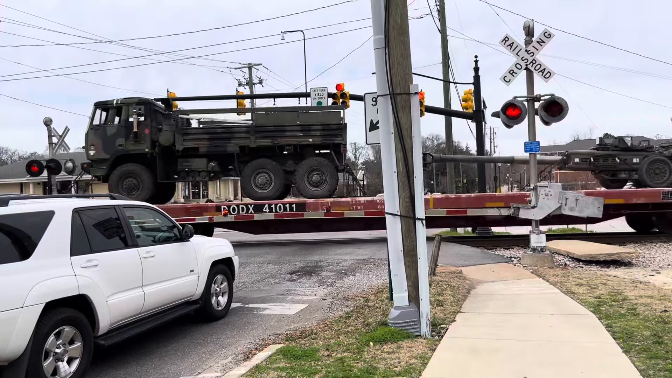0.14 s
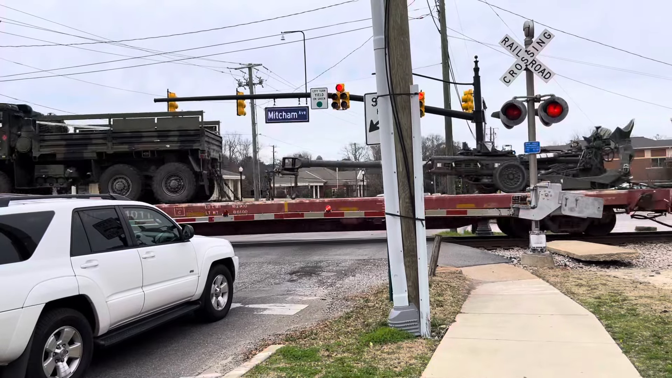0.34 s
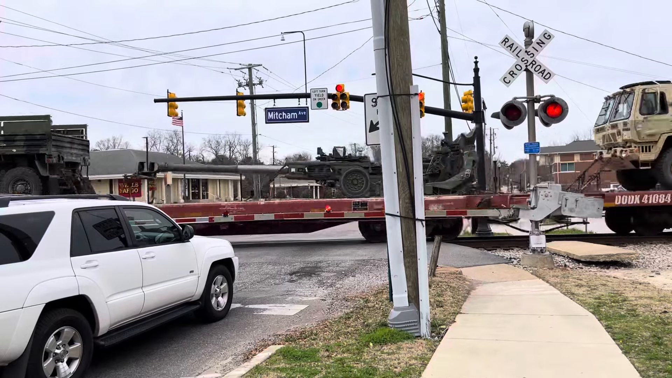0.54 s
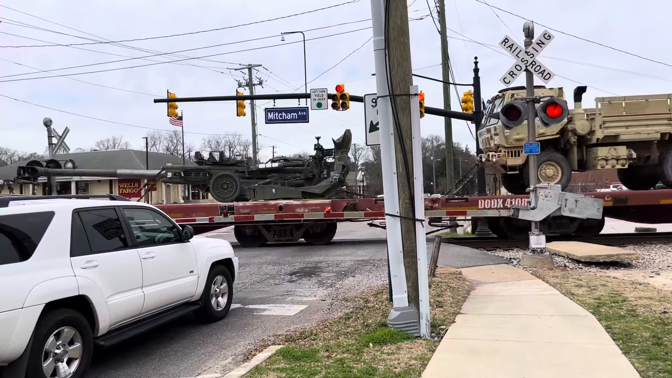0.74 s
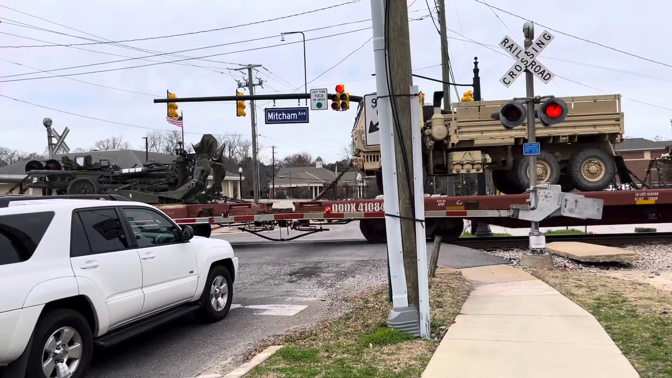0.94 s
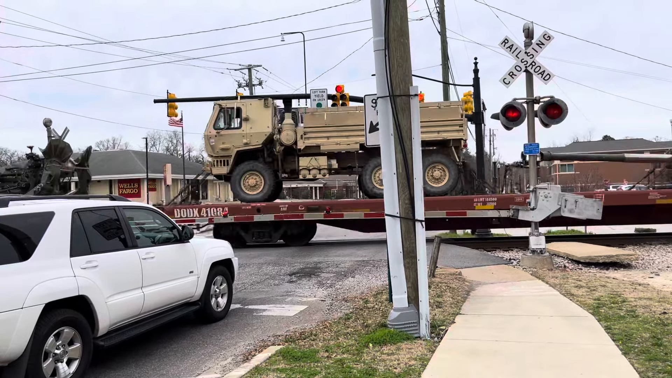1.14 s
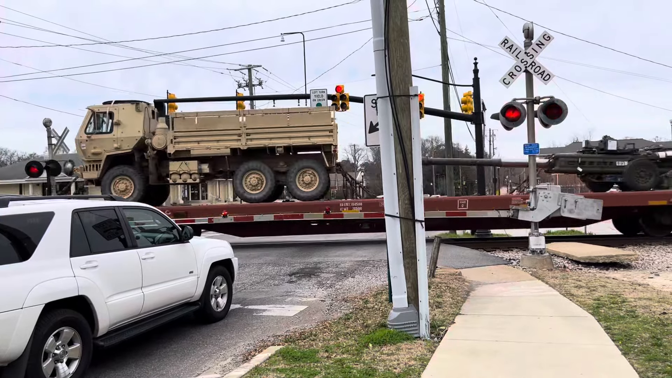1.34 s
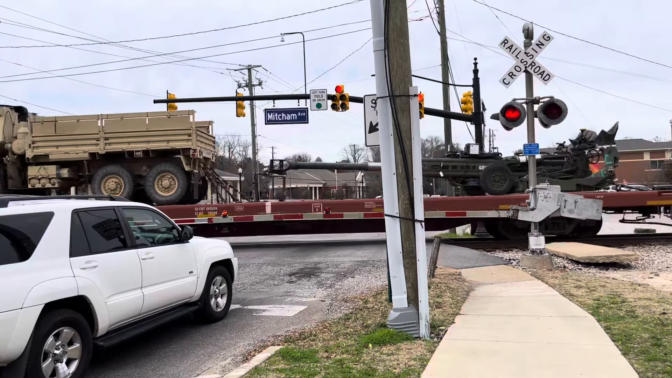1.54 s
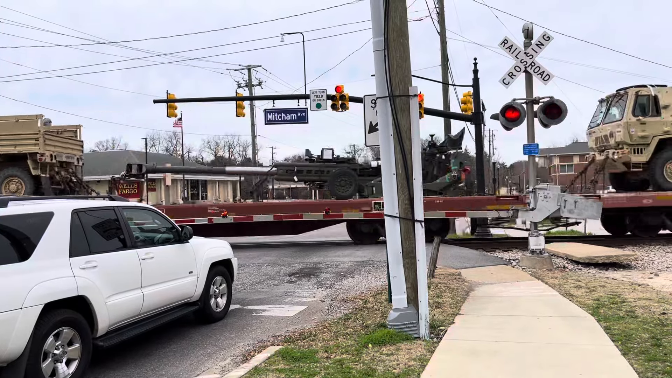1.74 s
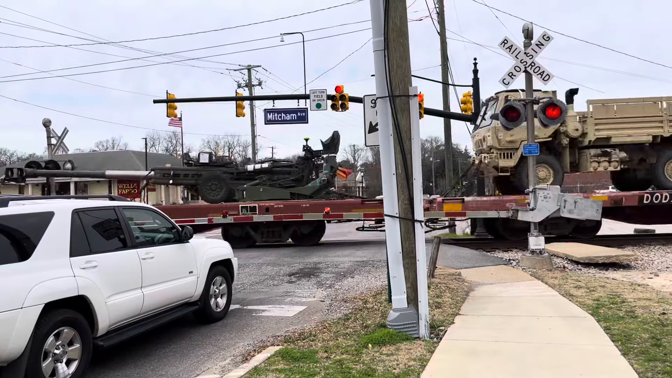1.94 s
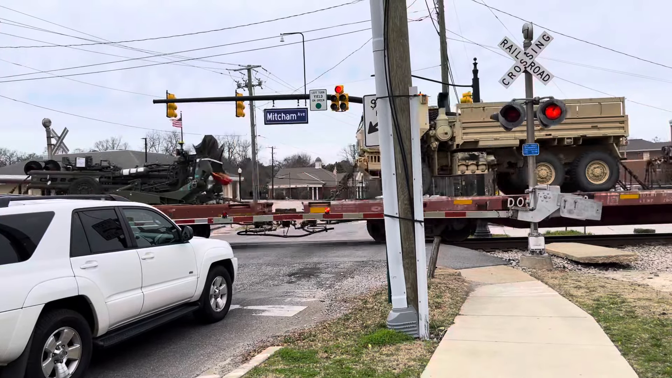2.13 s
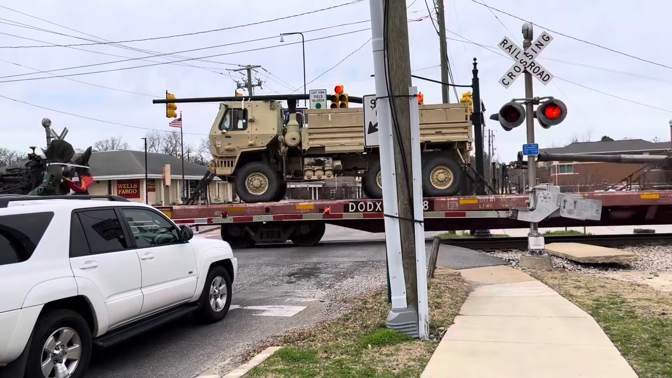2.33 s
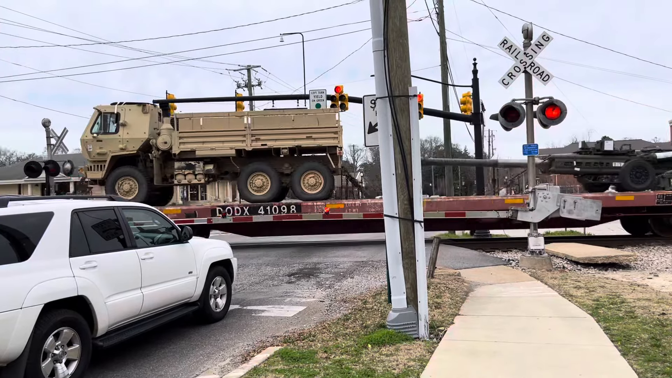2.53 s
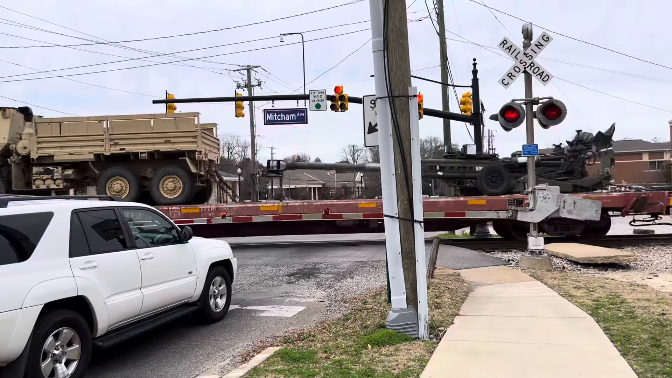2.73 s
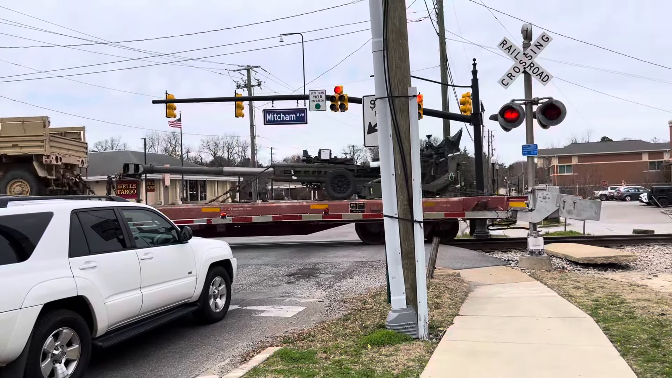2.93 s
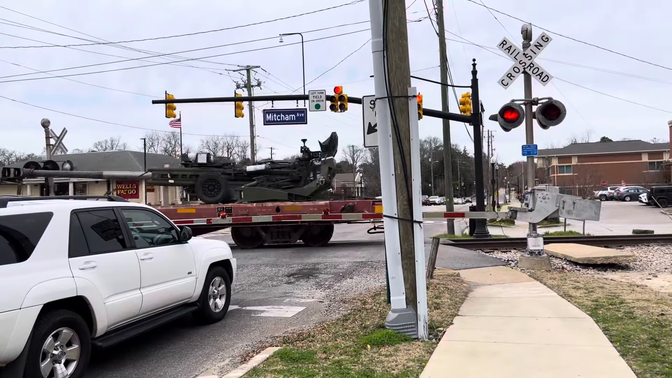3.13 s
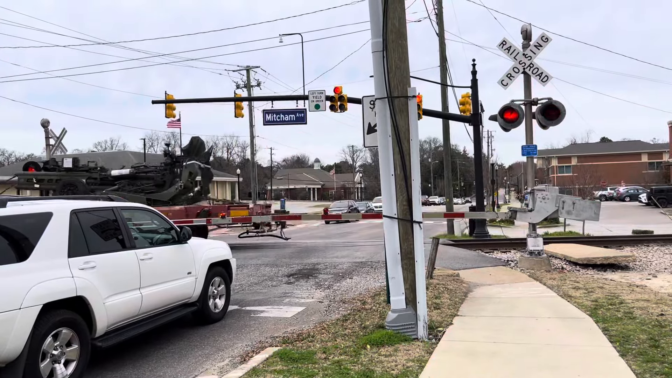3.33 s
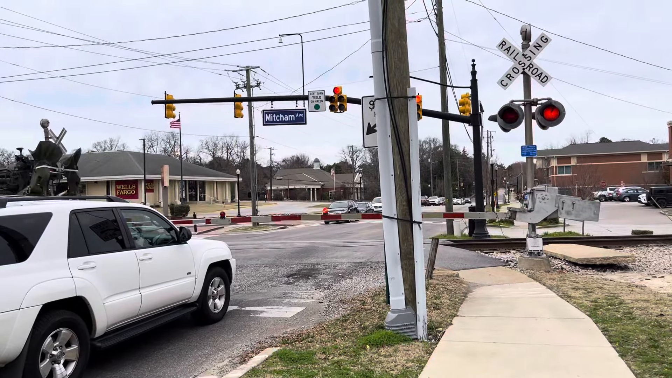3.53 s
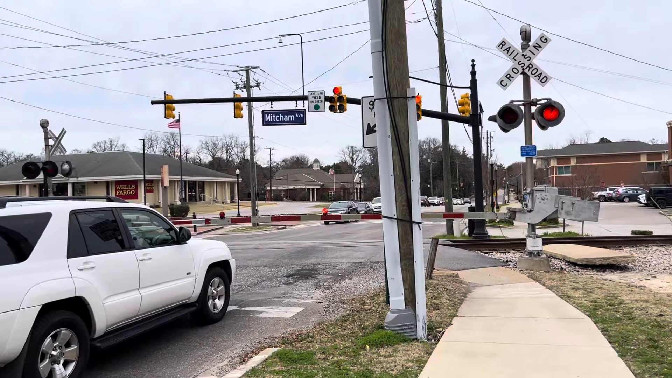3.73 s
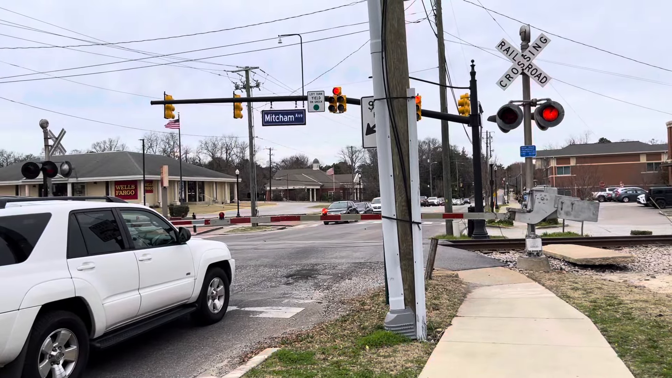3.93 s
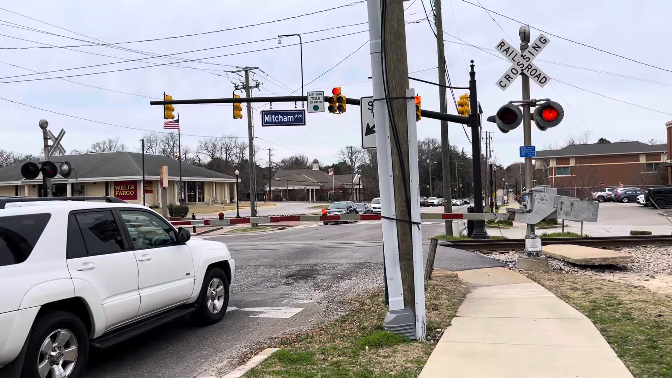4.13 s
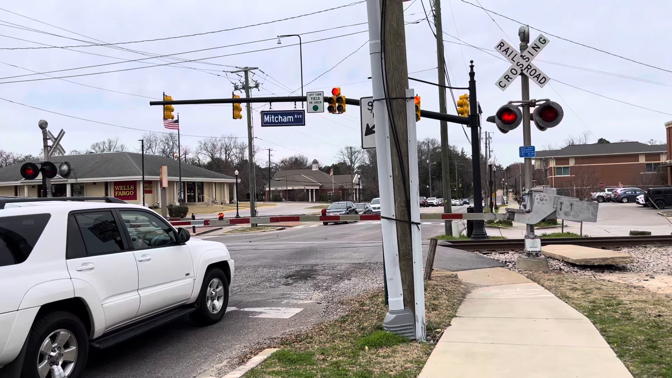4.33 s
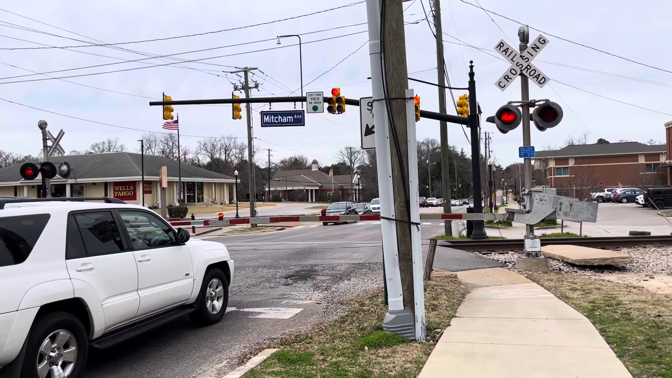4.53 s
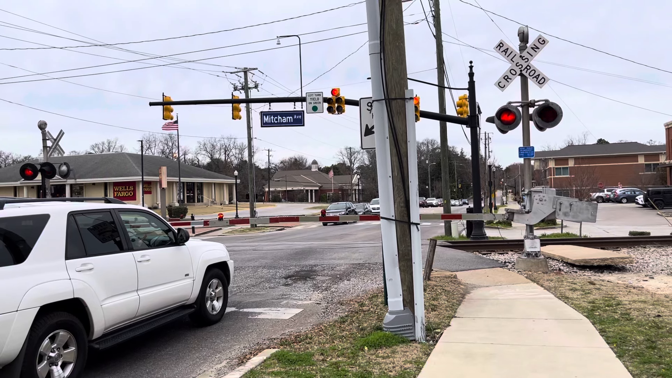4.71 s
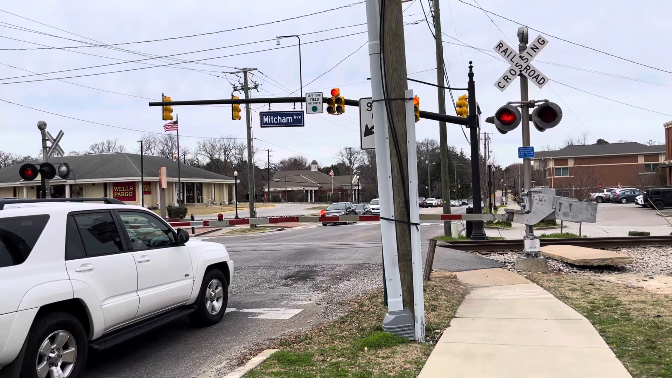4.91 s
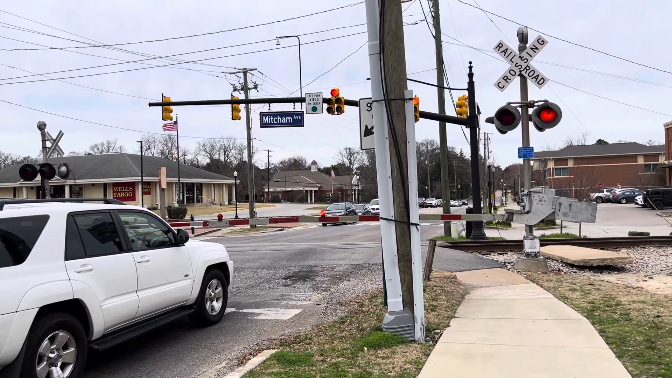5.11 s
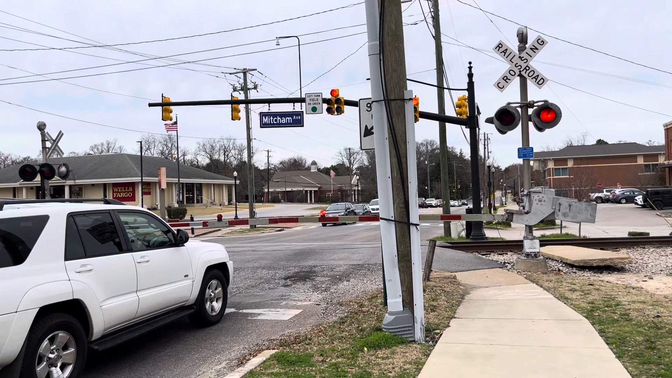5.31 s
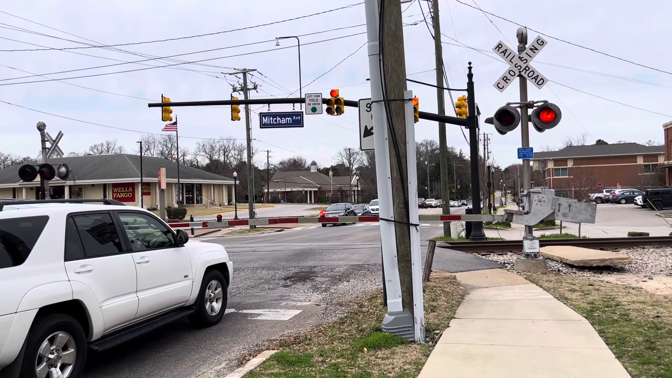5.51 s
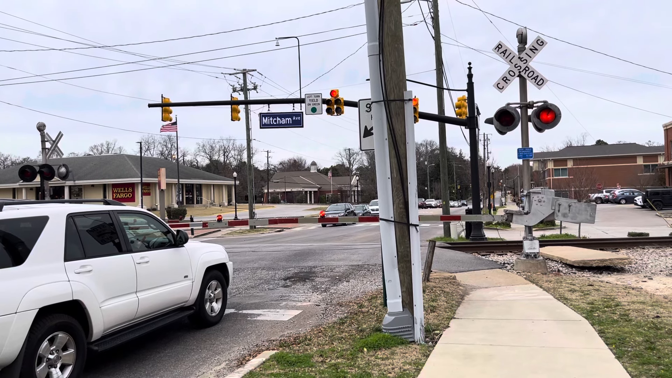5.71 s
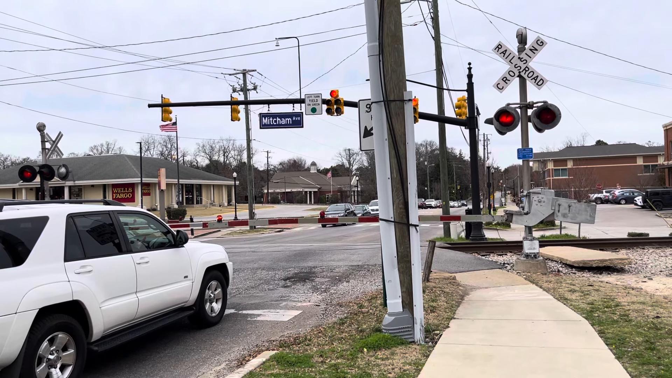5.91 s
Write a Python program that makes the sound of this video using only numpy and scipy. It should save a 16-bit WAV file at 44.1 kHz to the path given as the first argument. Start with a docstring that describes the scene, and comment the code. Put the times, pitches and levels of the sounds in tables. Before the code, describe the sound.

A freight train rumbles and hisses over a level crossing with brief flange squeaks, then recedes, leaving a steady metallic crossing-gong clank ringing out.

```python
"""Wheels rumble, roar and hiss over a level crossing a few car lengths off, and the freight train draws off left.
Flanges squeak, a rail whines, joints knock; a steel part, likely the crossing's damped gong, clanks four or five
times a second. Rolling is banded noise with flickering levels, squeaks and hum are noise in narrow resonances,
the whine is a wavering sine, and blows set decaying sines ringing.
Two microphone ports a hand apart hear the treble out of step."""
import sys
import numpy as np
from scipy import signal
from scipy.fft import rfft, irfft, next_fast_len
from scipy.io import wavfile

SR = 44100
rng = np.random.default_rng(int(sys.argv[2]) if len(sys.argv) > 2 else 0)


def digitize_waveform(pressure):
    """Quantize a signal to 16-bit integers and store it at the path in sys.argv[1].

    Rows of a 2-D input are taken as channels; values are limited to [-1, 1].
    """
    field = np.atleast_2d(pressure).T
    bounded = np.clip(field, -1, 1)
    quanta = np.round(bounded * 32767).astype(np.int16)
    wavfile.write(sys.argv[1], SR, quanta)


def attenuation_scalar(level_db):
    """Turn a level in dB into a linear amplitude multiplier (20 dB per decade)."""
    decades = np.asarray(level_db, float) / 20
    return 10 ** decades


N = 267239   # length in samples


def rms_one(x):
    """Scale to rms 1."""
    return x / np.sqrt(np.mean(x ** 2) + 1e-20)


def in_time(rows):
    """Read the columns of a table over time, one value per sample."""
    s, *columns = np.transpose(rows)
    return [np.interp(np.arange(N) / SR, s, column) for column in columns]


def at_hz(points, hz):
    """Read the columns of a table over log frequency."""
    known, *columns = np.transpose(points)
    return [np.interp(np.log(hz + 1), np.log(known), column) for column in columns]


def drift(rate_hz):
    """Slow random wander of spread 1: noise through two equal low-passes, made at every 40th sample."""
    r = np.exp(-80 * np.pi * rate_hz / SR)
    noise = rng.standard_normal(N // 40 + 2002)
    slow = signal.lfilter([1], [1, -2 * r, r * r], noise)[2000:]   # skip the filter's start
    return np.interp(np.arange(N) / 40, np.arange(len(slow)), rms_one(slow))


def ring(clicks, hz, t60_s):
    """A unit click sets a decaying sine of height 1 ringing."""
    r = attenuation_scalar(-60 / (max(t60_s, .005) * SR))
    w = 2 * np.pi * hz / SR
    return signal.lfilter([0, np.sin(w)], [1, -2 * r * np.cos(w), r * r], clicks + 1e-18)


def tone(hz, width_hz):
    """A wavering tone of rms 1: a pair of noises, each twice through a narrow resonance."""
    t60_s = np.log(1000) / (np.pi * width_hz)
    once = ring(rng.standard_normal((2, N)), hz, t60_s)
    return rms_one(ring(once, hz, t60_s))


def rolling(spectrum, patchy_db, count):
    """Rough wheels on rough rail: two unrelated noises in bands that flicker on their own; rms 1."""
    size = next_fast_len(N, True)
    hz = np.fft.rfftfreq(size, 1 / SR)
    low_hz, high_hz = spectrum[0][0], spectrum[-1][0]
    noise = rfft(rng.standard_normal((2, size))) * attenuation_scalar(at_hz(spectrum, hz)[0])
    noise[:, (hz < low_hz) | (hz > high_hz)] = 0
    place = np.log((hz + 1) / low_hz) / np.log(high_hz / low_hz) * (count - 1)
    jolt = drift(18.6)   # uneven track shakes all bands together
    total = np.zeros((2, N))
    for k in range(count):
        share = np.clip(1 - abs(place - k), 0, 1)   # neighbouring bands overlap
        band = irfft(noise * share, size)[:, :N]
        total += band * attenuation_scalar(patchy_db * (drift(12.4) + 0.74 * jolt))
    return rms_one(total)


def blows(times, peak_db, modes, spread_db, bounce_s):
    """Each blow and its three bounces, mostly weaker, strike every mode with a strength of their own."""
    late_s = bounce_s * rng.random((len(times), 4)) * [0, 1, 1, 1]
    at = np.minimum((times[:, None] + late_s) * SR, N - 1).astype(int)
    chance = rng.normal(0, 1, (len(times), len(modes), 5))
    out = np.zeros((2, N))
    for k, (hz, level_db, t60_s) in enumerate(modes):
        size = attenuation_scalar(peak_db + level_db + spread_db * chance[:, k, 0])[:, None]
        bounces = .2 * chance[:, k, 1:4]
        contacts = size * np.column_stack([np.ones(len(times)), bounces])
        clicks = np.zeros((2, N))
        clicks[0, at] = contacts                                  # direct sound
        clicks[1, at] = contacts * np.sign(chance[:, k, 4:5])     # scattered sound
        # subtracting a fast ring lets the sound build up within a millisecond or two
        out += ring(clicks, hz, t60_s) - ring(clicks, hz, .008)
    return out


# Hum of the track bed: (time_s, level_db)
HUM_LEVEL = [(0, -37), (.3, -39), (.6, -35), (1, -23.5), (1.5, -34.5), (2, -30.5), (3.2, -39), (3.6, -31.5),
             (4.3, -40.5), (6.06, -33)]


def track_bed_hum():
    """The track bed hums on one low wavering pitch."""
    return attenuation_scalar(in_time(HUM_LEVEL)[0]) * tone(59, width_hz=12.0)


# Thump through the ground: (time_s, level_db)
GROUND_LEVEL = [(0, -22.5), (.5, -20.5), (1, -28.5), (1.5, -26.5), (1.9, -36), (2.3, -25), (2.75, -29),
                (3.22, -22), (3.7, -34.5), (4.2, -32.5), (5, -35.5), (5.5, -29.5), (6.06, -31.5)]
# Colour of the thump: (frequency_hz, density_db)
THUMP_COLOUR = [(18, -45), (27, -28), (36, -17), (45, -14), (55, 8.5), (70, 1), (95, 0), (115, -3.5),
                (150, -3)]


def ground_thump():
    """Deep thump through the ground, coming in lumps."""
    return attenuation_scalar(in_time(GROUND_LEVEL)[0]) * rolling(THUMP_COLOUR, patchy_db=2.0, count=2)


# Thin whine of the rail, before a small common lift: (time_s, level_db)
WHINE_LEVEL = [(2.75, -85), (2.85, -52), (3.5, -62.5), (4.4, -62), (4.85, -69), (5.0, -85)]


def rail_whine():
    """The rail whines on one thin pitch, wavering separately in the direct and the scattered sound."""
    waver = []
    for _ in range(2):
        pitch_hz = 12275 + 11.5 * drift(15)
        phase = 2 * np.pi * np.cumsum(pitch_hz) / SR
        waver.append(attenuation_scalar(3.8 * drift(14)) * np.sin(phase))
    return attenuation_scalar(in_time(WHINE_LEVEL)[0] + 0.5) * waver


# Flange squeaks: (start_s, length_s, pitch_hz, level_db)
FLANGE_SQUEAKS = [(1.83, .05, 10870, -41), (.82, .2, 960, -32), (2.06, .035, 8800, -51),
                  (2.25, .03, 7600, -51), (2.25, .05, 3760, -43), (1.66, .04, 5750, -50),
                  (1.88, .2, 6280, -52), (2.32, .22, 6100, -51), (2.83, .13, 3470, -44),
                  (2.95, .1, 3465, -42), (3.04, .2, 3430, -46), (.47, .05, 11500, -55),
                  (.72, .3, 3900, -48), (2.98, .13, 2620, -43), (.24, .2, 2300, -45)]


def flange_squeaks():
    """Flanges catch the rail head and sing one wheel mode for a moment."""
    t = np.arange(N) / SR
    out = np.zeros((2, N))
    for start_s, length_s, pitch_hz, level_db in FLANGE_SQUEAKS:
        swell = np.sin(np.pi * np.clip((t - start_s) / length_s, 0, 1)) ** .6
        out += attenuation_scalar(level_db) * swell * tone(pitch_hz, width_hz=26)
    return out


# Wheels over rail joints, strength before the rail's modes and dulling: (start_s, strike_db)
JOINT_KNOCKS = [(.718, -31), (.855, -32), (.902, -27), (1.021, -24), (1.308, -18), (1.597, -24),
                (2.278, -21), (2.481, -28), (3.757, -13), (3.814, -14.5), (3.97, -18), (4.283, -16.5),
                (4.511, -20), (4.747, -18), (4.904, -20.5)]
# Modes of the struck rail: (pitch_hz, level_db, t60_s)
RAIL_MODES = [(950, 2, .03), (480, -7, .035), (700, -6, .03), (1500, -7, .025), (2350, -8, .02)]


def joint_knocks():
    """Wheels strike the rail joints and short rail modes answer, dulled by a low-pass."""
    # ten more knocks at random, weaker than most of those listed: s, dB
    more = rng.random((10, 2)) * [3.4, 5] + [0, -29.5]
    s, strike_db = np.vstack([JOINT_KNOCKS, more]).T
    struck = blows(s, strike_db, RAIL_MODES, spread_db=1.5, bounce_s=.004)
    return signal.lfilter([.15], [1, -.85], struck)


# Clear blows on the steel part, the last three being the mode groups near 3.2, 5.0 and 5.4 kHz
# over the blow: (start_s, blow_db, low_db, mid_db, high_db)
CLEAR_CLANKS = [(.8894, -39, -3, -15, -7), (1.094, -38, -3, -23, -5), (1.339, -36, -2, -20, -2),
                (1.7994, -47, -4, -12, -5), (2.019, -41, 3, -4, 2), (2.4232, -33, -1, -6, -11),
                (3.5145, -41.5, 5, -13, 5.5), (3.708, -43, 11, -11, 3.5), (3.925, -37.5, 3, -15, -8),
                (4.131, -43.5, -3, -11, 1), (4.3662, -48, 6, -9, -9), (4.59, -42, 3, -18, -7),
                (4.828, -44.5, 0, -16, 1), (5.0575, -48.5, -6, -18, -20), (5.2879, -39.5, 5, -20, -4),
                (5.506, -41.5, 1, -12, -12), (5.717, -33.5, 2.5, -4, -7), (5.9528, -47.5, 13.5, -14, -1)]
# Its modes in five groups, near 3.2, 4.6, 5.0 and 5.4 kHz and the rest: (pitch_hz, level_db, t60_s)
STEEL_MODES = [
    [(3208, 0, .16)],
    [(4560, 1, .09), (4608, -2, .11)],
    [(4972, 2, .24), (5050, 0, .22)],
    [(5368, 0, .12)],
    [(7144, -2, .24), (3875, -4, .25), (5862, -11, .25), (6223, -11, .2), (6318, -10, .2), (6659, -15, .3),
     (7009, -9, .25), (7060, -9, .25), (7542, -7, .3), (7973, -14, .2), (8091, -12, .2), (8312, -10, .2),
     (8952, -9, .28), (9345, -15, .22), (9889, -14, .15), (10018, -15, .3), (10408, -17, .15),
     (10755, -15, .3), (11009, -11, .3), (12096, -10, .2), (12235, -11, .22), (13378, -16, .35),
     (14530, -20, .2)],
]


def clanks():
    """Where the steel is struck decides which groups of modes speak; a short tick marks the contact."""
    swing_s, first_swing_s = .2187, .015
    beat = np.arange(16) * swing_s + first_swing_s
    # faint blows fill the same beat while the train drowns them
    faint_db = 3 * rng.standard_normal((16, 4)) + [-51, 0, -9, -3]
    faint = np.column_stack([beat, faint_db])
    nearest_s = abs(beat[:, None] - np.array(CLEAR_CLANKS)[:, 0]).min(axis=1)
    free = nearest_s > swing_s / 2
    s, blow_db, low_db, mid_db, high_db = np.vstack([CLEAR_CLANKS, faint[free]]).T
    level = np.zeros(len(s))
    groups_db = blow_db + np.array([low_db, level, mid_db, high_db, level - 6.5])
    rings = np.zeros((2, N))
    for modes, group_db in zip(STEEL_MODES, groups_db):
        spread_db = 0.18 * len(modes) ** 0.95
        rings += blows(s, group_db, modes, spread_db, bounce_s=.04)
    contact = np.zeros(N)
    contact[(s * SR).astype(int)] = attenuation_scalar(np.max(groups_db, axis=0) - 5.5)
    fade = signal.lfilter([1], [1, -np.exp(-1 / (0.0014 * SR))], contact)   # 1.4 ms
    tick = fade * rng.standard_normal((2, N))
    tick_band = signal.butter(2, [2800, 13000], "band", fs=SR, output="sos")
    return rings + signal.sosfilt(tick_band, tick)


# Modes of the wheel discs: (pitch_hz, width_hz, level_db)
WHEEL_MODES = [(950, 170, -1), (1480, 100, -9), (1640, 70, -12), (1890, 70, -16), (2120, 80, -16),
               (2400, 120, -14), (2680, 80, -17), (3050, 80, -20), (3440, 70, -21), (3760, 60, -21),
               (3930, 60, -21), (4560, 80, -24)]


def wheel_ring(level_db, flicker_db):
    """The roughness also rings the wheel discs; each mode comes and goes at random."""
    out = np.zeros((2, N))
    for hz, width_hz, mode_db in WHEEL_MODES:
        out += attenuation_scalar(mode_db + flicker_db * drift(8.8)) * tone(hz, width_hz)
    return attenuation_scalar(level_db) * out


# The train, swelling as each set of axles comes abreast, before the layers' own trims:
# (time_s, rumble_db, roar_db, hiss_db)
TRAIN_LEVEL = [(0, -15.5, -28, -35), (.18, -19.5, -30.5, -37.5), (.36, -20, -34.5, -43),
               (.49, -19, -30.5, -38), (.6, -18.5, -32.5, -40), (.72, -18.5, -31.5, -36),
               (.82, -21.5, -31.5, -39.5), (.95, -18.5, -32, -40), (1.1, -18, -33.5, -41),
               (1.5, -16.5, -31, -40), (1.86, -16.5, -29.5, -36), (2.2, -16, -29.5, -36.5),
               (2.33, -16, -31.5, -38.5), (2.46, -14, -29.5, -36.5), (2.72, -16.5, -31.5, -40.5),
               (3.22, -19, -31, -37), (3.45, -23, -37, -45.5), (3.7, -25, -35, -46),
               (4.15, -26.5, -38, -46), (4.55, -30, -37, -48), (5.1, -33, -37.5, -49),
               (6.06, -36, -41, -52)]
# Colours with the train abreast and far off: (frequency_hz, density_db)
RUMBLE_ABREAST = [(47, -46), (80, -4.5), (113, -10.5), (157, -1), (209, -2.5), (251, 0.5), (399, -7),
                  (487, -8.5), (543, -13.5), (700, -21), (910, -71), (1540, -120)]
RUMBLE_FAR_OFF = [(47, -64), (80, -6.5), (150, -7.5), (221, -7), (249, -6.5), (301, -6), (333, -9),
                  (381, -6), (700, -17.5), (910, -64), (1540, -120)]
ROAR_ABREAST = [(500, -32), (600, -1), (780, 2.5), (960, -1), (1250, -3.5), (1500, -0.5), (1900, -8),
                (2400, -9), (2900, -12.5), (3300, -24)]
ROAR_FAR_OFF = [(500, -8), (600, 0), (780, -2.5), (950, 3.5), (1250, -5.5), (1500, 2.5), (1900, -12.5),
                (2450, -8.5), (2900, -16.5), (3300, -42)]
HISS_ABREAST = [(2400, -11.5), (2900, 1.5), (3900, -1.5), (5000, -5.5), (6500, -8.5), (8500, -12.5),
                (11000, -15.5), (13000, -17.5), (15500, -28), (18000, -50)]
HISS_FAR_OFF = [(2400, -2), (2900, 0), (3350, -5.5), (3800, -2.5), (4300, -5), (5500, -13.5), (8500, -27),
                (11000, -23), (12400, -25), (13000, -30), (15500, -34), (18000, -50)]


def wheels(rumble, roar, hiss):
    """Wheels rolling on the rails: rumble, roar and hiss, each on its own level, over the ground thump."""
    rumble_db, roar_db, hiss_db = in_time(TRAIN_LEVEL)
    out = ground_thump()
    out += attenuation_scalar(rumble_db) * rolling(rumble, patchy_db=1.06, count=5)
    out += attenuation_scalar(roar_db + 1.5) * rolling(roar, patchy_db=1.74, count=5)
    out += attenuation_scalar(hiss_db + 1.0) * rolling(hiss, patchy_db=1.57, count=5)
    return out


# The port pair with the train abreast, with the train gone (the right port hearing it late), and
# in the treble: (frequency_hz, likeness_0_to_1, right_phase_lead_rad, left_over_right_db)
PORTS_ABREAST = [(60, .985, 0, 1.4), (140, .94, .1, 2.4), (250, .95, .1, 2.2), (450, .88, .2, 2),
                 (700, .55, .2, 1), (1100, .3, -.4, 3), (1300, .3, 2.4, 3), (1600, .25, 2.2, -1),
                 (1900, .7, .7, 5), (2250, .9, 0, 0), (2600, .7, -.7, 2.5), (3400, .6, -1.3, 3),
                 (4000, .55, 0, 4), (5200, .5, -1, 5)]
PORTS_FAR_OFF = [(60, .99, 0, 1), (250, .94, -.3, 2), (500, .78, -.6, 2), (950, .8, -1.8, 4),
                 (1400, .9, -3.1, -3), (1650, .8, -3.4, -2), (1900, .6, -5.8, 5), (2300, .93, -6.3, 0),
                 (2900, .85, -8, -2), (3300, .75, -9.1, 4), (3700, .5, -10.8, 5), (4300, .8, -12.5, 3),
                 (5300, .65, -13.7, 4)]
PORTS_IN_TREBLE = [(5450, .55, 2.3, 3.5), (6300, .6, 1.1, 2), (7000, .7, 1.7, 1), (7900, .95, 3.1, 0),
                   (8800, .93, 3.3, 0), (10000, .7, 4.6, 0), (11300, .96, 6.2, 0), (13000, .93, 6.5, 0),
                   (14000, .8, 8.6, 0), (15500, .95, 9.4, 0)]


def ports(pair, table):
    """A direct and a scattered sound reach two ports; in the treble the housing alone sets their phase."""
    size = next_fast_len(N + 4096, True)
    hz = np.fft.rfftfreq(size, 1 / SR)
    treble = hz > PORTS_IN_TREBLE[0][0]
    alike, lead_rad, left_db = np.where(treble, at_hz(PORTS_IN_TREBLE, hz), at_hz(table, hz))
    direct, scattered = rfft(pair, size)
    mixed = alike * direct + np.sqrt(1 - alike ** 2) * scattered
    right = mixed * np.exp(1j * lead_rad)
    return irfft([direct * attenuation_scalar(left_db / 2), right * attenuation_scalar(-left_db / 2)], size)[:, :N]


# Share of the sound from the departed tail: (time_s, share_0_to_1)
GONE_SHARE = [(0, 0.05), (3.1, 0), (3.6, 0.44), (4.6, 0.99), (6.06, 1)]


def scene():
    """The train abreast gives way to the train far off; knocks and clanks come from the left."""
    gone = np.clip(in_time(GONE_SHARE)[0], 0, 1)
    ringing = wheel_ring(in_time(TRAIN_LEVEL)[1] - 3.5, flicker_db=3.0)   # follows the roar
    abreast = wheels(RUMBLE_ABREAST, ROAR_ABREAST, HISS_ABREAST) + ringing
    far_off = wheels(RUMBLE_FAR_OFF, ROAR_FAR_OFF, HISS_FAR_OFF) + attenuation_scalar(-8.5) * ringing
    near = np.sqrt(1 - gone) * abreast + flange_squeaks() + rail_whine() + track_bed_hum()
    left = np.sqrt(gone) * far_off + clanks() + joint_knocks()
    return ports(near, PORTS_ABREAST) + ports(left, PORTS_FAR_OFF)


def top_cut(x):
    """Nothing passes above the cut-off."""
    return signal.sosfilt(signal.butter(12, 15050, fs=SR, output="sos"), x)


def record(dry):
    """The loudest peaks are rounded smoothly below a ceiling."""
    ceiling = .95   # of full scale
    mix = ceiling * np.tanh(dry / ceiling)
    return top_cut(mix)


dry = scene()
out = record(dry)
digitize_waveform(out)
```